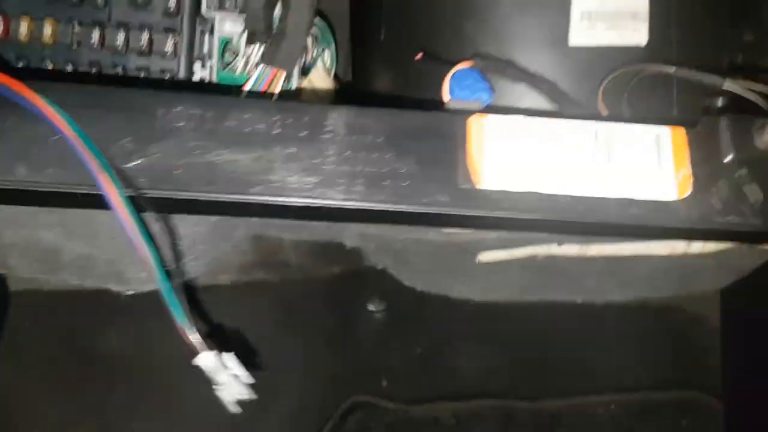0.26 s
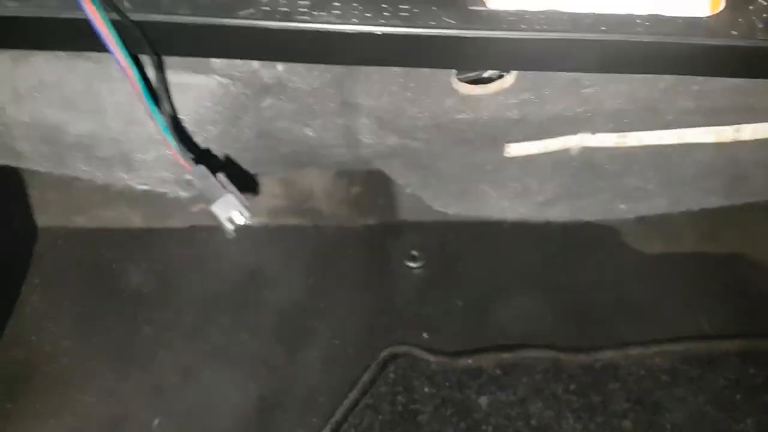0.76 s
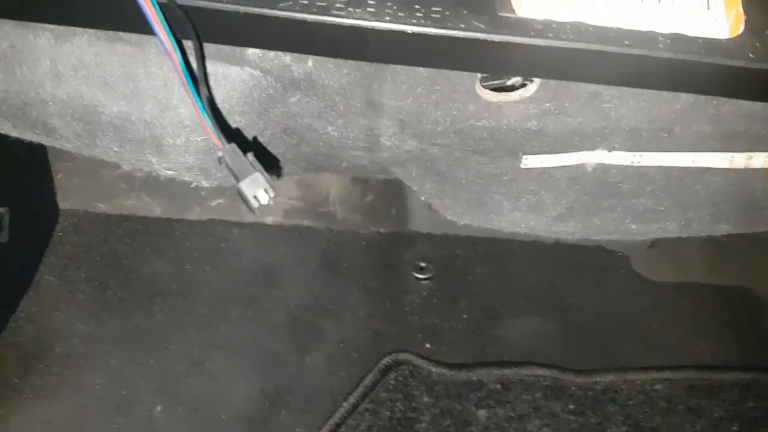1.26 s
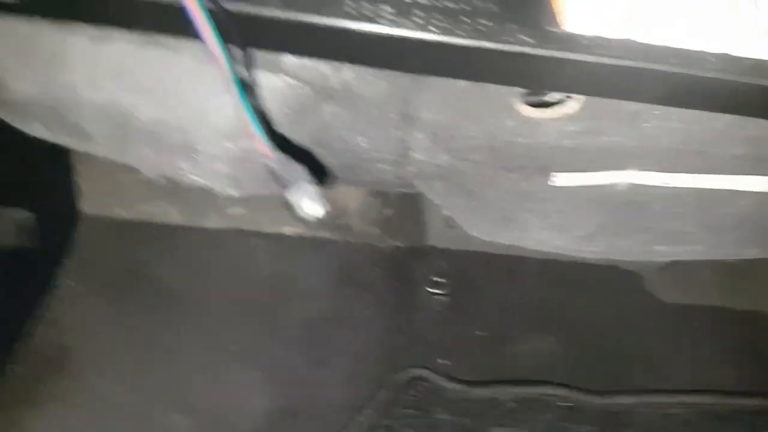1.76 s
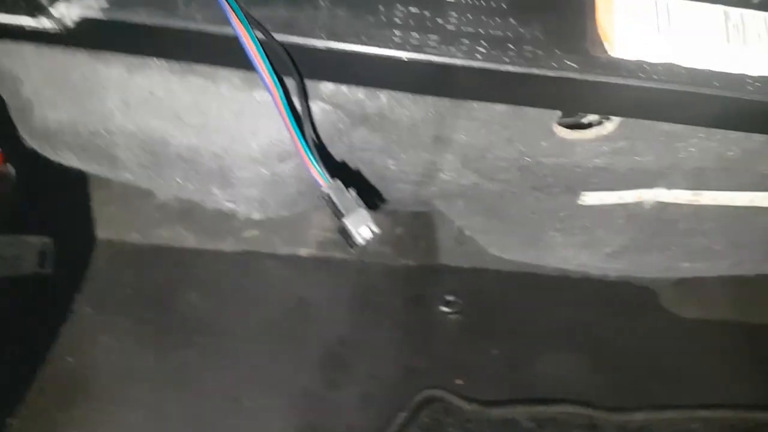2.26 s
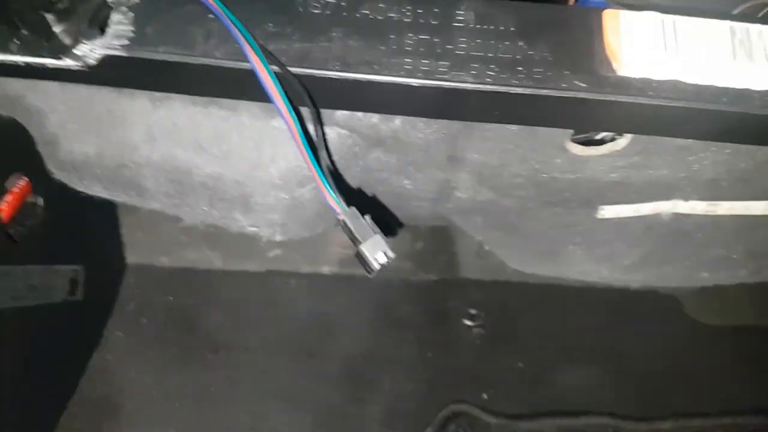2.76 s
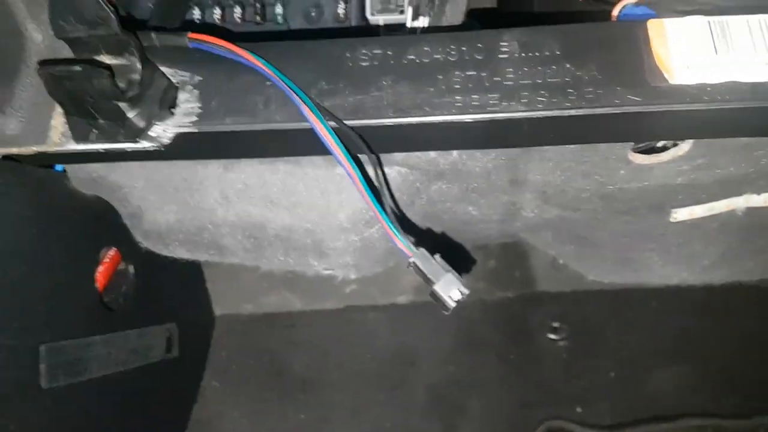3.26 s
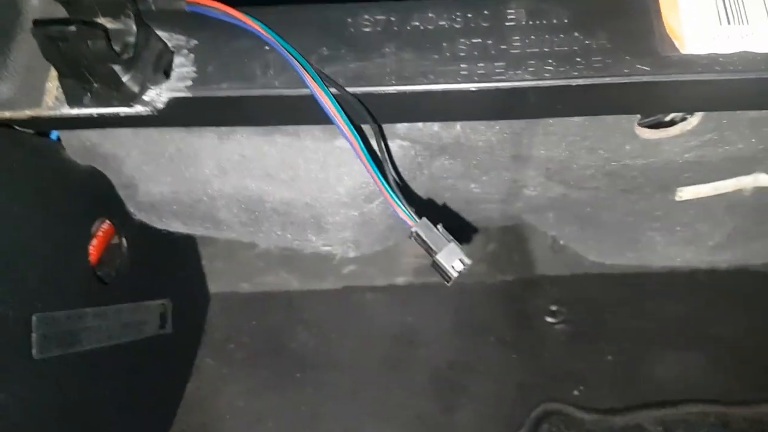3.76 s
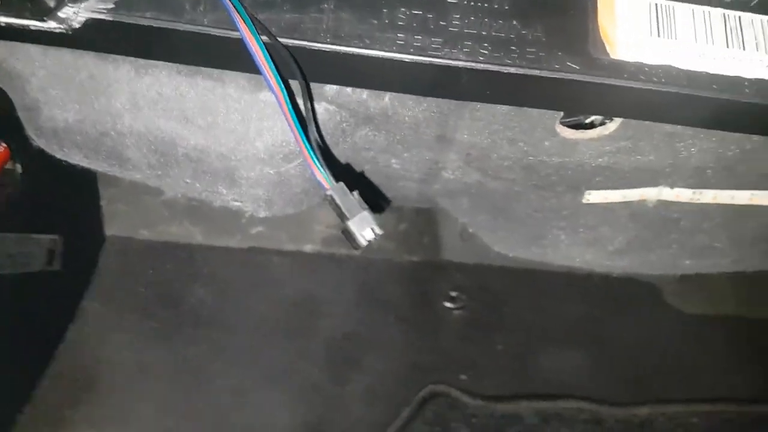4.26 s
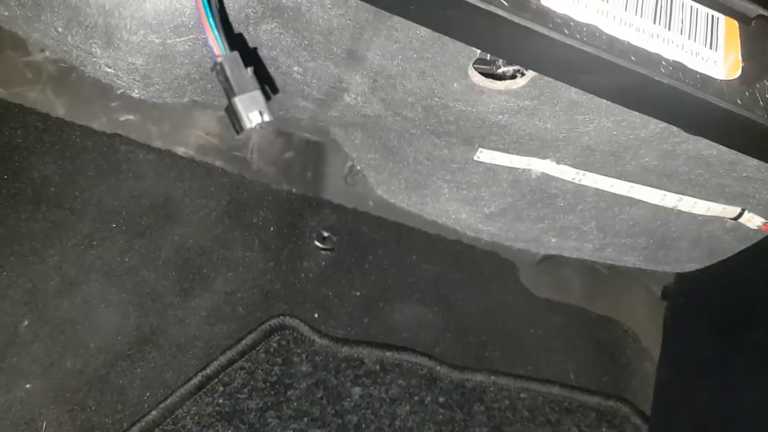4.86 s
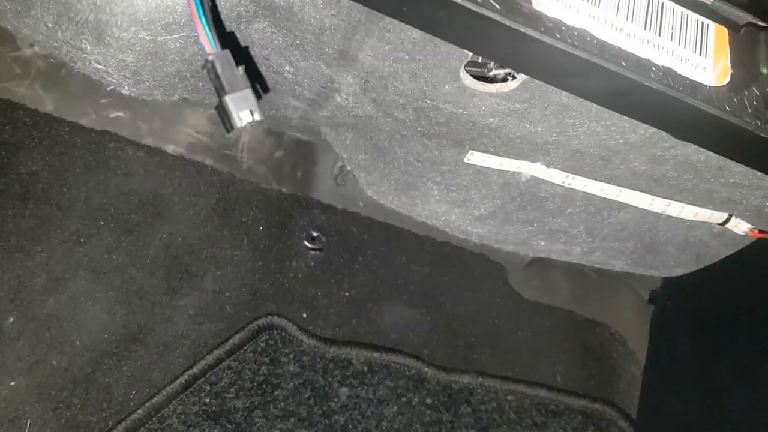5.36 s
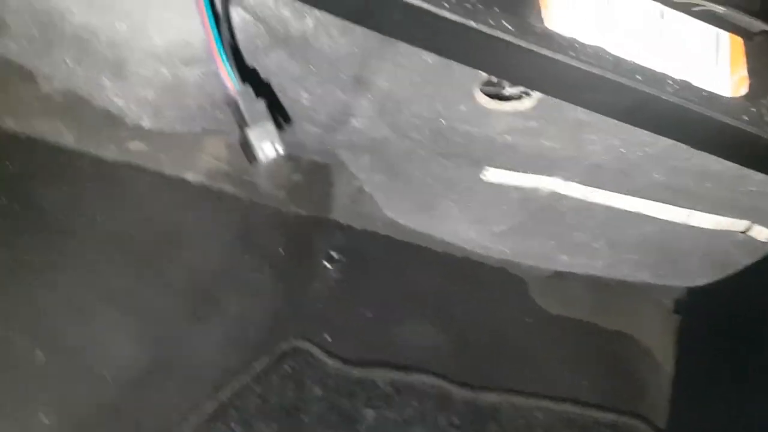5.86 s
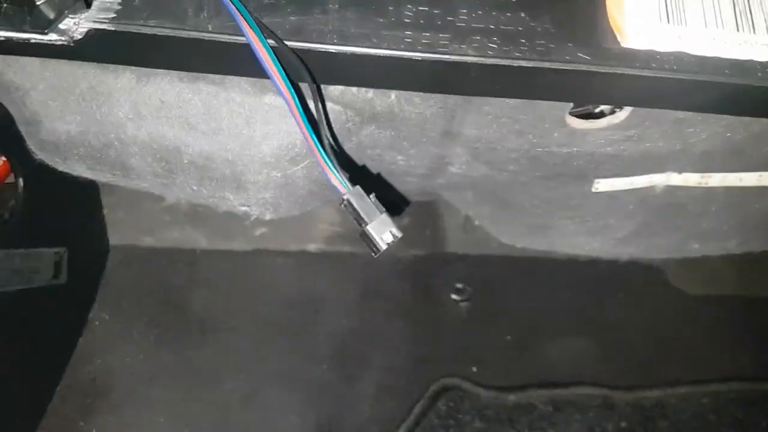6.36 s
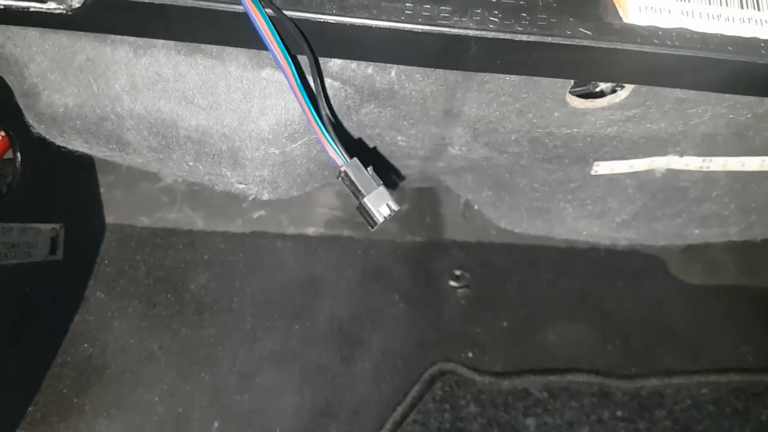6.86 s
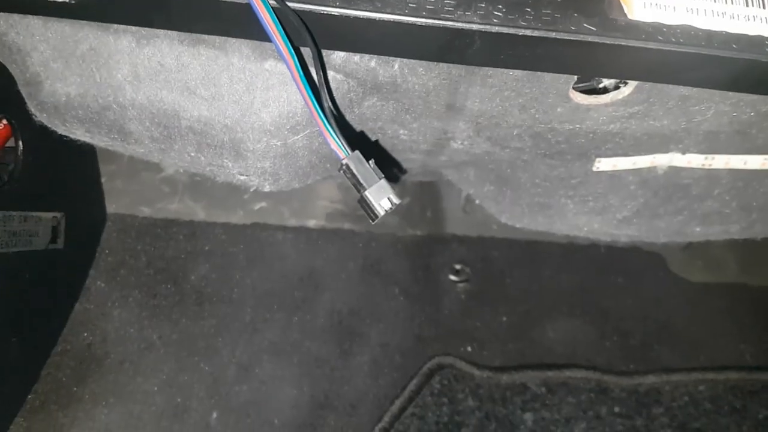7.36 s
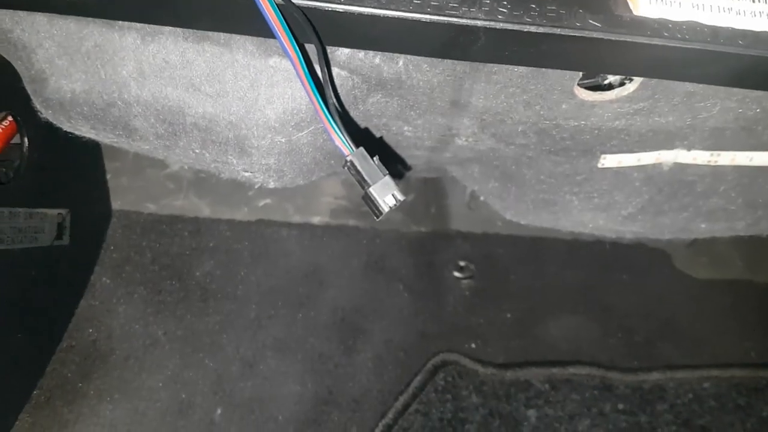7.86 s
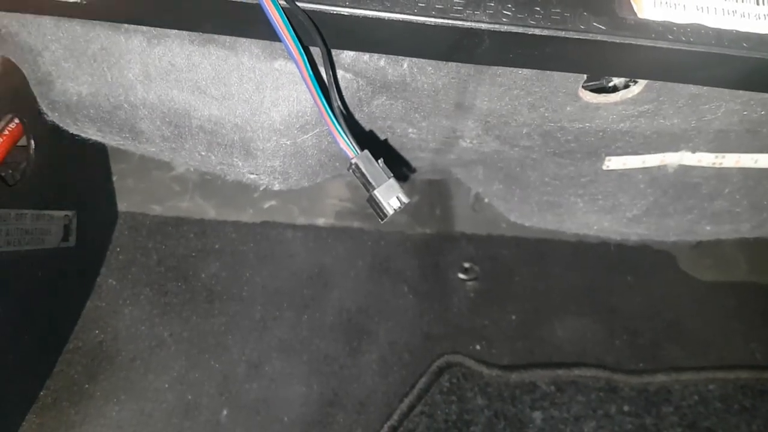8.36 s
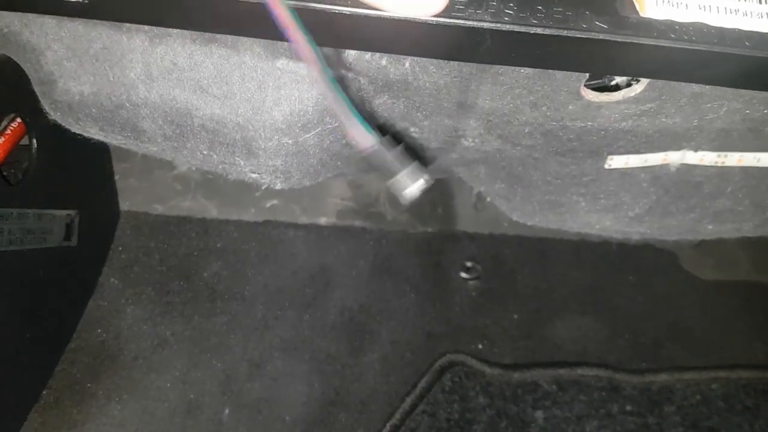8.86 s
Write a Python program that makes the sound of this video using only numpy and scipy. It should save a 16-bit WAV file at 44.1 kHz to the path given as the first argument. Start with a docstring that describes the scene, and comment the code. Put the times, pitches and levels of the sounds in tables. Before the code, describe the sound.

Close handling rustle opens, fading to faint cabin rumble. Plastic panel clips release with sharp cracks and hollow knocks, irregularly spaced, with a burst of stick-slip scraping after the second big knock. Tiny clicks and soft settling thuds fill the gaps, and a far bird is barely audible. The last second and a half is finger rubbing, ticks and short hollow scrapes on the hand-held phone in a dry car interior.

```python
"""Prying trim off in a parked car

Plastic clips let go with a crack and a hollow knock: impulses that excite decaying panel modes and a dense ring.
Between them the panel drags and judders by stick-slip; soft low modes thud as it settles and the phone is bumped.
At the start and near the end fingers slide over the hand-held phone and tap its case, as noise and resonances;
a sleeve brushes faintly before the later slides. Shaped noise gives the faint rumble of the cabin and a rustle
of sleeves; a far bird cries three times on a falling harmonic tone."""
import sys
import numpy as np
from scipy import signal
from scipy.fft import rfft, irfft, next_fast_len
from scipy.io import wavfile
from scipy.ndimage import uniform_filter1d

SR = 44100
rng = np.random.default_rng(int(sys.argv[2]) if len(sys.argv) > 2 else 0)


def to_wav(s):
    """Save 16-bit WAV."""
    ch = np.atleast_2d(s).T  # columns
    pcm = np.round(np.clip(ch, -1, 1) * 32767)  # PCM
    wavfile.write(sys.argv[1], SR, pcm.astype(np.int16))


N = 402191
TIME = np.arange(N) / SR
PIVOT_HZ = 1000  # the brightness tilt of a blow turns about this frequency
# Edges of the frequency zones in which a blow is balanced, from boom to tick: a single list in Hz.
ZONE_EDGES = [90, 220, 450, 1250, 2400, 7000, 16000]
# Spectrum of the dragged panel. Each row: frequency in Hz, relative level in dB.
DRAG_SPECTRUM = [(50, -32.5), (100, -14), (200, -9), (290, -3), (480, -10.5), (560, -10.5), (800, -21.5),
                 (1300, -23.5), (2200, -27.5), (3200, -32.5), (5000, -38.5), (7500, -44), (9500, -51.5),
                 (15000, -53)]
# Spectrum of rubbing on the phone. Each row: frequency in Hz, relative level in dB.
RUBBING_SPECTRUM = [(300, -4), (700, 7), (1400, 2), (2400, -2), (3400, -8), (5000, -9.5), (7000, -10.5),
                    (9000, -19), (12000, -15.5), (15500, -16.5)]


def undb(db):
    """Amplitude gain is ten to the power of the level in decibels over twenty."""
    return 10 ** (np.asarray(db) / 20)


def unit(x):
    """Normalise to a root-mean-square of 1."""
    return x / np.sqrt(np.mean(x ** 2))


def steady(x, size=1500):
    """Divide by the running rms over size samples: slow swings even out and the fine grain stays."""
    power = x ** 2
    running = uniform_filter1d(np.mean(power, axis=0), size)
    return x / np.sqrt(running + 1e-3 * np.mean(power))


def add(track, s, sound):
    """Superpose a stereo sound on the track from time s in seconds."""
    i = max(int(s * SR), 0)
    track[:, i:i + sound.shape[1]] += sound[:, :max(N - i, 0)]


def along(points, hz):
    """Interpolate (Hz, value) points linearly over log frequency."""
    f, value = np.transpose(points)
    return np.interp(np.log(np.maximum(hz, 1)), np.log(f), value)


def colour(x, points, size=4096):
    """Minimum-phase filter through (Hz, dB) points: folding the real cepstrum makes it causal."""
    log_gain = np.log(undb(along(points, np.fft.rfftfreq(size, 1 / SR))))
    cepstrum = irfft(log_gain)
    cepstrum[1:size // 2] *= 2
    cepstrum[size // 2 + 1:] = 0
    impulse_response = irfft(np.exp(rfft(cepstrum)))
    return signal.fftconvolve(x, impulse_response[None], axes=1)[:, :x.shape[1]]


def cut(x, hz, kind, order=4):
    """Butterworth filter, maximally flat in its passband."""
    return signal.sosfilt(signal.butter(order, hz, kind, fs=SR, output="sos"), x)


def resonate(x, hz, q):
    """Second-order resonance of sharpness q, with its output at rms 1."""
    return unit(signal.lfilter(*signal.iirpeak(hz, q, fs=SR), x))


def diffuse(n, likeness=0.52):
    """Diffuse-field noise at two spaced ports: sinc coherence, alike in the bass and not in the treble."""
    gap_m, sound_speed = 0.18, 343  # m, m/s
    size = next_fast_len(n, True)
    coherence = np.sinc(2 * np.fft.rfftfreq(size, 1 / SR) * gap_m / sound_speed)
    alike = min(likeness, 0.99) * coherence
    mid, side = rfft(rng.standard_normal((2, size))) * np.sqrt([1 + alike, 1 - alike])
    return unit(irfft([mid + side, mid - side], size)[:, :n])


def walk(rate):
    """Slow random modulation of rms 1: random values, changing rate times a second, smoothed into ramps."""
    k = int(SR / rate)
    held = np.repeat(rng.standard_normal(N // k + 1), k)
    return unit(uniform_filter1d(held, k)[:N])


def follow(s, db):
    """Gain along a level curve interpolated in dB over time, silent outside it."""
    return undb(np.interp(TIME, s, db, left=-np.inf, right=-np.inf))


def stroke(s, length, swell_db=0):
    """Envelope of one slide: linear attack, a hold changing by swell_db per second, exponential release."""
    attack_s, release_s = 0.013, 0.011
    t = TIME - s
    attack = np.clip(t / attack_s, 0, 1)
    hold = undb(swell_db * np.clip(t, 0, length))
    release = np.exp(-np.clip((t - length) / release_s, 0, 20))
    return attack * hold * release


def slips(rate, scatter_db):
    """Stick-slip as a random impulse train: small releases, uneven in spacing and size."""
    chance = rng.random(N) < rate / SR
    return chance * undb(scatter_db * np.clip(rng.standard_normal(N), -2, 2))


def pops():
    """Impulsive release of clips and knocks on the seat: each favours a bending mode and one of the rib."""
    # Each row: start in seconds, level in dB, brightness in dB per octave, ring time factor,
    # direct snap in dB before balancing, flex mode in Hz, its weight in dB, rib mode in Hz, its weight in dB,
    # bite around 3 kHz in dB, treble left minus right in dB.
    releases = [(0.7896, -21.5, -1.54, 0.96, 22, 313.5, 3.5, 540, -8, -5.5, 1.5),
                (0.825, -49.5, -5, 1.86, 7, 291, 18.5, 544, -11, 2, 1),
                (1.091, -60.5, 3, 0.21, 8, 177, 11, 860, -9, 11, -5),
                (1.2418, -18.5, 1.5, 0.94, 4, 292, -13, 2050, -13.5, 2.5, 5),
                (1.2487, -35, -0.5, 1.5, -9, 302, -14, 1140, -14, -19, 0),
                (1.783, -43, -4.5, 1.5, 11, 323, -10, 572, 2, -7, 14),
                (1.837, -50.5, -6, 1.4, 12, 281, 9, 556, -5, 0, -6),
                (1.9091, -46.5, 1.5, 0.62, 23, 306, 3, 2400, -9.5, 6, 8),
                (1.93, -41.5, -6, 1.6, 12, 314, 2, 1350, -9, 0, 2),
                (1.956, -34.5, -2, 1.2, 16, 300, -10, 624, -3, -9, -7),
                (1.969, -43, -6, 1.1, 15, 298, 4.5, 2600, -7, -1, 11),
                (2.037, -33, -2.5, 1.35, 18.5, 280, -18, 569, -0.5, -11, -5),
                (2.055, -41.5, -3, 2, 18, 258, -2, 578, 6, -4, 11),
                (3.4699, -25, 5, 0.53, 30, 278, -7.5, 1537, -6, -10.5, 5),
                (3.473, -27.5, 2, 0.92, 19.5, 635, -19, 1787, -9, -0.5, 5.5),
                (3.6027, -56, 0.5, 1.05, 9, 215, 1, 2070, -14, 4, 0),
                (3.749, -60.5, 2.5, 0.36, 22, 287, -19, 1690, -9, -2, 6),
                (4.124, -63.5, -4, 1.3, 12, 297, 5.5, 1540, -16, 7, 6.5),
                (4.5935, -32, 1, 1.63, 14.5, 374.5, 2, 2460, -32, 3.5, 9.5),
                (4.607, -40.5, 2.5, 1.25, 6, 165, -2, 1260, -31, 2, -1),
                (4.679, -38.5, -2.5, 1.1, 10.5, 316.5, 2, 1910, -21, 5, 10),
                (4.833, -63, 2, 0.91, 13, 168, 6, 2210, -5.5, 2, 2),
                (5.3837, -53.5, 5, 0.96, 4, 307, -27.5, 1340, -4.5, -0.5, -1.5),
                (5.802, -56, 0.8, 0.65, 19, 289, -3.5, 955, -17.5, 1, 3.5),
                (6.1444, -28, -0.5, 0.43, 29, 602, -6.5, 1626, -4, -4.5, -9.5),
                (6.1532, -39, -3.5, 1.06, 14, 309, -3, 1566, -4.5, -5, -2),
                (6.165, -52, 0.5, 1.4, 9, 402, -5, 1650, -5, 4, 0),
                (6.532, -53, -4.5, 1.6, 14, 294, 6.5, 2130, -13, 1, 10),
                (6.541, -56.5, 2, 1.6, 11, 297, 8, 1950, -3, -5, 9),
                (6.749, -54.5, -3, 0.87, 20, 330, -8, 605, -5, 4, 8),
                (6.834, -59, -3.5, 0.61, 22, 330, 1, 593, 3, 4, 9)]
    # Level of each zone before the brightness tilt: a single list in dB.
    balance = [-12, -2, -5.5, -11.5, -17.5, -34]
    flex_t60_s, rib_t60_s = 0.085, 0.042  # before the ring time factor
    bite_hz, bite_span = 3000, 1.6  # centre of a barb's rasp; frequency ratio to its edges
    out = np.zeros((2, N))
    for s, db, brightness, ring, snap_db, flex_hz, flex_db, rib_hz, rib_db, bite_db, pan_db in releases:
        favoured = [(flex_hz, flex_db, flex_t60_s), (rib_hz, rib_db, rib_t60_s)]
        bite = [(bite_hz / bite_span, 0), (bite_hz, bite_db), (bite_hz * bite_span, 0)]
        knock = blow(balance, brightness, ring, snap_db, favoured, pan_db)
        add(out, s, undb(db) * colour(knock, bite))
    return out


def blow(balance_db, brightness, ring, snap_db, favoured, pan_db):
    """Contact excitation: a harder push tilts to the treble; the spot hit favours (Hz, dB, t60 s) modes."""
    # Raw spectrum of the plastic before balancing. Each row: frequency in Hz, relative level in dB.
    plastic = [(35, -19.5), (70, -7), (120, -17), (170, -1), (290, -5), (430, -1.5), (630, 0), (800, -10),
               (1000, -4), (1600, -9.5), (2800, -17.5), (3400, -22), (5200, -27.5), (7500, -33.5),
               (9500, -41.5), (13000, -40.5), (16000, -49)]
    knee_hz = 262  # below this, the hardness of the contact changes nothing
    edges = np.array(ZONE_EDGES)
    centres = np.sqrt(edges[1:] * edges[:-1])
    levels_db = balance_db + brightness * np.log2(np.maximum(centres, knee_hz) / PIVOT_HZ)
    out = colour(panel(ring, contact_db=snap_db, modes_db=-15.5), plastic)
    for _ in range(2):  # neighbouring zones overlap, so the balance is set in two passes
        out = colour(out, np.c_[centres, levels_db - zone_db(out)])
    t = np.arange(out.shape[1]) / SR
    for hz, db, t60 in favoured:
        tone = mode(t, hz, t60 * ring, port_phase=min(hz / PIVOT_HZ, 1))
        out = out + undb(db) * tone / np.linalg.norm(undb(zone_db(tone)))
    # the phone's body shades only the treble
    left = colour(out[[0]], [(900, 0.005), (4500, pan_db / 2)])
    right = colour(out[[1]], [(900, 0.005), (4500, -pan_db / 2)])
    return np.concatenate([left, right])


def panel(ring, contact_db, modes_db, count=9000):
    """Impulse response of the trim: a direct snap, its modes, and the dense ring of dashboard and footwell."""
    # Panel modes. Each row: frequency in Hz, relative weight in dB, t60 in seconds before the ring time factor.
    modes = [(162.7, -8, 0.11), (233, -9, 0.043), (303, -2, 0.13), (398, -4, 0.11), (552, -8, 0.077),
             (900, -2.5, 0.099), (1120, -17.5, 0.062), (1310, -6, 0.11), (1517, -4.5, 0.048),
             (2061, -3.5, 0.1), (2170, -2, 0.026), (2550, -9, 0.11), (2914, -1, 0.071), (4200, -7.5, 0.046)]
    # Decay of the dense ring. Each row: frequency in Hz, t60 in seconds before the ring time factor.
    footwell = [(100, 0.33), (260, 0.14), (700, 0.12), (1840, 0.089), (4850, 0.046), (12800, 0.056)]
    t = np.arange(count) / SR
    f = np.fft.rfftfreq(count, 1 / SR)
    noise = rfft(diffuse(count, likeness=0.39))
    centres = np.geomspace(100, 12800, 8)
    out = np.zeros((2, count))
    for hz, share in zip(centres, np.eye(len(centres))):
        band = irfft(noise * along(np.c_[centres, share], f), count)
        near_decay = 1000 ** (-t / (ring * along(footwell, hz)))
        # the rest of the cabin gives back a weak, longer tail
        cabin_decay = undb(-30.0) * 1000 ** (-t / 0.13)
        out += band * (near_decay + cabin_decay)
    for hz, db, t60 in modes:
        detuned_hz = hz * (1 + 0.0018 * rng.standard_normal())
        out += undb(modes_db + db) * mode(t, detuned_hz, ring * t60)
    # the barb chatters for an instant as it slips past the edge of its hole
    out += undb(contact_db - 6.5) * diffuse(count) * np.exp(-t / 0.0025)
    out[:, 0] += undb(contact_db)
    return out


def mode(t, hz, t60, port_phase=0.79):
    """Damped normal mode: it builds up within a quarter cycle, its phase (spread in rad) differing by port."""
    onset = 1 - np.exp(-(2 * np.pi * hz * t) ** 2)
    phase = port_phase * rng.standard_normal((2, 1))
    return onset * np.sin(2 * np.pi * hz * t + phase) * 1000 ** (-t / t60)


def zone_db(x, size=1323):
    """Band levels by Parseval's theorem: the spectral power of the first 30 ms, summed in each zone."""
    padded = 4 * size
    power = 2 * np.mean(np.abs(rfft(x[:, :size], padded)) ** 2, axis=0) / (padded * size)
    return 10 * np.log10(np.histogram(np.fft.rfftfreq(padded, 1 / SR), ZONE_EDGES, weights=power)[0])


def thuds():
    """Single-mode excitation as the panel settles, the dashboard sways and, near the end, the phone is bumped."""
    # Each row: start in seconds, frequency in Hz, level in dB, rise in seconds, t60 in seconds.
    pushes = [(0.79, 48, -40, 0.0018, .22), (0.957, 266, -20.5, 0.0059, 0.098),
              (0.98, 287, -20, 0.0046, 0.12), (0.971, 169, -33.5, 0.0092, 0.16),
              (1.096, 183, -45.5, .008, 0.13), (3.47, 128.6, -40, .002, 0.26),
              (3.478, 285, -36.5, 0.0034, 0.24), (4.594, 152, -31, 0.0021, 0.18),
              (4.608, 245.4, -27.5, 0.0029, 0.19), (4.682, 162, -27.5, 0.0035, 0.18),
              (6.046, 190, -41, .005, 0.11), (6.142, 76.6, -38.5, .002, 0.21),
              (6.146, 164.5, -36, 0.0023, 0.2), (7.826, 234, -36, .003, 0.079),
              (8.034, 247, -39, 0.0021, 0.11), (8.519, 191, -31, 0.0056, 0.14),
              (8.859, 176, -34.5, 0.005, 0.075)]
    out, t = np.zeros((2, N)), np.arange(SR // 2) / SR
    for s, hz, db, rise, t60 in pushes:
        cushion = 1 - np.exp(-(t / rise) ** 2)
        add(out, s, undb(db) * cushion * mode(t, hz, t60, port_phase=0.26))
    return out


def drags():
    """Stick-slip friction: coarse slips make the panel judder; fine ones from its grained surface add grit."""
    # One long pull along the seat. Each row: time in seconds, judder level in dB before a 2 dB cut,
    # grit level in dB before a 3 dB lift.
    pull = [(1.72, -54, -79), (1.763, -33, -53), (1.8, -31.5, -52.5), (1.817, -38, -57), (1.84, -32.5, -50),
            (1.955, -25.5, -42), (1.982, -34, -44.5), (2.026, -27.5, -50), (2.04, -31, -45),
            (2.068, -32, -52.5), (2.09, -33, -53), (2.154, -79, -83), (2.16, -68, -77)]
    # Brief shifts on the seat. Each row: peak time in seconds, swell time in seconds, judder level in dB,
    # grit level in dB.
    shifts = [(0.922, 0.0035, -44, -59), (0.976, 0.024, -39, -51.5), (1.11, 0.068, -56.5, -61.5),
              (1.321, 0.023, -47, -55), (1.561, 0.076, -51.5, -56), (2.466, 0.0084, -41.5, -57.5),
              (2.911, 0.041, -51, -62), (2.995, 0.043, -63, -60.5), (3.165, 0.014, -40, -55.5),
              (3.317, 0.012, -45, -62.5), (3.761, 0.028, -54, -65.5), (3.898, 0.023, -44, -53),
              (4.488, 0.013, -53.5, -73.5), (4.586, 0.0033, -41.5, -42.5), (4.971, 0.028, -58, -62),
              (5.27, 0.054, -62, -59.5), (6.05, 0.042, -53, -59.5), (6.24, 0.16, -60, -64.5),
              (6.467, 0.0059, -49, -69), (6.565, 0.012, -50, -65), (6.601, 0.0035, -47.5, -61),
              (6.643, 0.011, -56.5, -83), (6.723, 0.0052, -50, -72), (6.785, 0.022, -56.5, -65),
              (6.919, 0.058, -61, -75)]
    s, judder_db, grit_db = np.transpose(pull)
    pull_grit = follow(s, grit_db + 3)
    judder_power, grit_power = follow(s, judder_db - 2) ** 2, pull_grit ** 2
    for s, swell, judder_db, grit_db in shifts:
        near = np.abs(TIME - s) < 10 * swell
        pressure = np.exp(-np.abs((TIME[near] - s) / swell))
        judder_power[near] += pressure * undb(judder_db) ** 2
        grit_power[near] += pressure * undb(grit_db) ** 2
    judder = steady(cut(rub(rate=180, scatter_db=5.5), [115, 750], "band"), size=900)
    grit = steady(cut(rub(rate=2000, scatter_db=1.5), 748, "high"))
    # the edge of the panel chafes with a thin ring under the long pull
    chafe = undb(-16.5) * resonate(grit, 2220, q=9.4)
    return judder * np.sqrt(judder_power) + grit * np.sqrt(grit_power) + chafe * pull_grit


def rub(rate, scatter_db, count=4):
    """Multi-point friction: each contact rings the panel its own way while the load shifts between them."""
    out = 0
    for _ in range(count):
        pushes = slips(rate / count, scatter_db)
        load = undb(5.69 * walk(25))
        response = colour(panel(0.81, contact_db=2, modes_db=-16.5), DRAG_SPECTRUM)
        loaded = (pushes - pushes.mean()) * load
        out = out + signal.oaconvolve(loaded[None], response, axes=1)[:, :N]
    return out


def creep():
    """Slow creep of the held panel as low-passed noise: faint and wavering under the other sounds."""
    texture = unit(cut(colour(diffuse(N), DRAG_SPECTRUM), 600, "low"))
    return texture * stroke(0.47, length=7.3) * undb(-72 + 4 * walk(19))


def taps():
    """Impact on a resonant case: short, bright ticks of fingers on the phone, mostly nearer the left port."""
    # Each row: start in seconds, level in dB, brightness in dB per octave, ring time factor,
    # case mode in Hz, its weight in dB, treble left minus right in dB.
    ticks = [(0.329, -71, 3, 0.33, 4400, -6, 6), (0.367, -55.5, -0.5, 0.45, 2270, 3.5, 22.5),
             (0.366, -61, 1.5, 0.33, 4330, 6.5, 3), (7.814, -70, 2, 0.27, 3080, 7, 9),
             (7.8208, -40, 2.5, 0.31, 1500, -17, 8), (7.9126, -42.5, -0.5, 0.39, 2580, -0.5, 9),
             (7.917, -51.5, -0.5, 0.72, 744, 9.5, -8), (8.4744, -46.5, -2, 1.4, 652, 5, 1),
             (8.539, -55, 0, 0.66, 940, 10, 3), (8.56, -54, -1.5, 0.64, 890, 6.5, 3),
             (8.592, -50, -2, 1, 6400, -12, 3), (8.676, -53.5, -7.5, 0.55, 2280, -11, 0),
             (8.757, -52.5, 0, 1.2, 5400, -9, 4), (8.777, -56, 1.5, 0.6, 6850, -13, 4),
             (8.797, -59, 1, 0.46, 885, -11, 5), (8.851, -59, 0.5, 0.46, 2200, -14, 3),
             (9.014, -55, -0.5, 1.9, 730, -6, 3), (9.068, -62, 3.5, 0.8, 7000, -11, 6),
             (9.086, -57, 1, 0.5, 2620, -9, 4)]
    # Level of each zone before the brightness tilt: a single list in dB.
    balance = [-12, -8.5, -8.5, -7, -7, -11]
    out = np.zeros((2, N))
    for s, db, brightness, ring, hz, mode_db, pan_db in ticks:
        favoured = [(hz, mode_db, 0.04)]
        add(out, s, undb(db) * blow(balance, brightness, ring, -7.5, favoured, pan_db))
    return out


def fingers_and_sleeve():
    """Friction noise of sliding fingers, and at 7.27 s a faint brush of a sleeve, mostly nearer the left port."""
    # Each row: start in seconds, length in seconds, rasp level in dB at the start, swell in dB per second,
    # hiss against rasp in dB, left minus right in dB, ring of the rubbed spot in Hz,
    # its level against rasp in dB, crackle against rasp in dB. The row at 7.269 is the sleeve.
    slides = [(0, 0.26, -54, -48, -15, 3, 2100, -23, -13), (0.267, 0.037, -58, 94, -11, 4.5, 2170, -4, -13),
              (0.312, 0.24, -59.5, -61, -13, 2.5, 1400, -24, -3),
              (7.269, 0.13, -70, -13, -11.5, 6, 2990, -14.5, -11),
              (7.695, 0.12, -50, 122.5, -11.5, 4.5, 2470, -12.5, -12),
              (7.849, 0.18, -55.5, -9, -21, 5, 2800, -7, -6),
              (7.898, 1, -51, -30.5, -10.5, 3, 2480, -20, -22),
              (8.497, 0.098, -50, -5, -11.5, 4, 2230, -16, -2),
              (8.608, 0.074, -51, 25, -14, 5, 2300, -14, -12),
              (8.685, 0.13, -60.5, -59, -16, -1, 2380, -21, -6),
              (8.78, 0.074, -49, 8, -9, 3, 4350, -13, -13),
              (8.862, 0.16, -51, -54, -11, 2, 2420, -24, -4.5),
              (9.014, 0.1, -54, 26, -8.5, 4, 3000, -28, -4)]
    friction, grains = ridges_on_case(), crackle()
    stutter = undb(1.4 * walk(70))
    rasp = steady(cut(friction, [520, 4000], "band")) * stutter
    hiss = steady(cut(friction, 4200, "high")) * stutter
    out = np.zeros((2, N))
    for s, length, db, swell_db, hiss_db, pan_db, spot_hz, spot_db, crackle_db in slides:
        lean = np.array([[pan_db], [-pan_db]]) / 2
        spot = resonate(rasp + hiss / 2, spot_hz, q=1.6)
        rubbing = rasp + undb(hiss_db) * hiss + undb(spot_db) * spot + undb(crackle_db) * grains
        out += stroke(s, length, swell_db) * undb(db + lean) * rubbing
    return out


def ridges_on_case(count=7):
    """Impulse trains through short responses: fine ridges catch, and each spot rings with its own colour."""
    t, out = np.arange(1024) / SR, 0
    for _ in range(count):
        catches = slips(rate=2600, scatter_db=2) * rng.standard_normal(N)
        spot = diffuse(len(t)) * np.exp(-t / 0.0035)
        load = undb(6 * walk(20))
        out = out + signal.oaconvolve((catches * load)[None], spot, axes=1)[:, :N]
    return colour(out, RUBBING_SPECTRUM)


def crackle(count=5):
    """Sparse stick-slip: now and then a ridge catches hard and snaps free, each spot with its short ring."""
    t, out = np.arange(512) / SR, 0
    for _ in range(count):
        spot = diffuse(len(t)) * np.exp(-t / 0.002)
        catches = slips(260 / count, scatter_db=4.5)  # 260 per second over all spots
        out = out + signal.oaconvolve(catches[None], spot, axes=1)[:, :N]
    return steady(cut(colour(out, RUBBING_SPECTRUM), 450, "high"), size=4000)


def sticking():
    """Stick-slip driving resonances: a fingertip grips and slips, drawing a hollow scrape from the case."""
    # Each row: start in seconds, length in seconds, level in dB.
    scrapes = [(8.468, 0.016, -45), (8.503, 0.044, -40.5), (8.586, 0.014, -38.5)]
    # Resonances of the case. Each row: frequency in Hz, width in Hz, relative level in dB.
    resonances = [(564.5, 9.9, 10.5), (692, 14, -2), (916, 17, 5), (2040, 34, -4), (2650, 130, -14),
                  (3970, 90, -15), (4700, 55, -13), (6390, 43, -22)]
    catches = diffuse(N) * slips(rate=1600, scatter_db=-1.0)
    ring = sum(undb(db) * resonate(catches, hz, hz / width) for hz, width, db in resonances)
    return steady(ring) * sum(undb(db) * stroke(s, length) for s, length, db in scrapes)


def grip():
    """Handling noise: the grip shifting on the phone rumbles as low noise that both ports hear much alike."""
    # Two lists of points, at the start and at the end. Each row: time in seconds,
    # rumble level in dB before a 1 dB cut.
    grip_shifts = [
        [(0.0, -45), (0.024, -56), (0.11, -60.5), (0.322, -51.5), (0.404, -60.5), (0.47, -67), (0.514, -73),
         (0.6, -86)],
        [(7.68, -62.5), (7.732, -49), (8.428, -53.5), (8.532, -44.5), (8.8, -53), (8.868, -45.5),
         (8.928, -50.5), (9.12, -46)],
    ]
    # Spectrum of the rumble. Each row: frequency in Hz, relative level in dB.
    rumble_spectrum = [(18, -27), (30, -1), (128, -1), (196, 1.5), (243, 1), (389, -2), (502, -8.5),
                       (579, -17.5), (900, -36), (1170, -13), (1980, -120)]
    rumble = steady(colour(diffuse(N, likeness=0.89), rumble_spectrum))
    return rumble * undb(-1) * sum(follow(*np.transpose(points)) for points in grip_shifts)


def sleeves():
    """Amplitude-modulated noise: a faint, wavering rustle of sleeves."""
    cloth = [(100, -30.0), (300, 7.0), (700, -7.0), (1600, -4.5), (3200, -11), (8000, -21.5), (15000, -32.0)]
    waver = undb(2.2 * walk(10))
    return unit(colour(diffuse(N), cloth)) * waver * undb(-78)


def cabin():
    """Diffuse-field background: the low rumble and thin hiss of the cabin as spectrally shaped noise."""
    # Each row: frequency in Hz, relative level in dB.
    air_spectrum = [(13, -37.5), (22, -3), (49, 4), (87, -6), (118, -7.5), (160, -14), (467, -31.5),
                    (598, -25), (832, -19.5), (1010, -23), (1190, -25), (1360, -22.5), (1750, -26),
                    (4220, -35), (9500, -43.5), (13000, -36.5), (15800, -37)]
    return unit(colour(diffuse(N), air_spectrum, size=16384)) * undb(-59 + walk(10.0))


def bird():
    """Harmonic synthesis of a hoarse, falling cry from far away, with one echo and an exponential tail."""
    # Each row: start in seconds, starting pitch in Hz, level in dB.
    cries = [(3.975, 1575, -72.5), (5.098, 1605, -72.5), (5.88, 1565, -69.5)]
    # Relative levels of the harmonics from the fundamental up: a single list in dB.
    harmonics = [0, -7, -13]
    length_s, fall, hoarseness = 0.2, 0.12, 0.011  # fall and hoarseness are shares of the pitch
    echo_s, echo_db, tail_t60_s, tail_db = 0.125, -6, 0.9, 1
    out, t = np.zeros((2, N)), np.arange(int(0.7 * SR)) / SR
    progress = np.minimum(t / length_s, 1)
    envelope = np.sqrt(np.maximum(np.sin(np.pi * progress), 0))
    for s, hz, db in cries:
        pitch = hz * (1 - fall * progress ** 1.4 + hoarseness * walk(500)[:len(t)])
        phase = 2 * np.pi * np.cumsum(pitch) / SR
        flutter = undb(2.5 * walk(60)[:len(t)])
        voice = sum(undb(harmonic_db) * np.sin(k * phase) for k, harmonic_db in enumerate(harmonics, 1))
        cry = envelope * flutter * voice
        tail = diffuse(len(t)) * 1000 ** (-t / tail_t60_s)
        tail = tail / np.linalg.norm(tail[0])
        heard = cry + undb(tail_db) * signal.fftconvolve(cry[None], tail, axes=1)[:, :len(t)]
        add(out, s, undb(db) * heard)
        add(out, s + echo_s, undb(db + echo_db) * heard)
    return out


def scene():
    """Linear superposition of trim, handling of the phone, sleeves, cabin and a far bird at the two ports."""
    trim = pops() + thuds() + drags() + creep()
    handling = taps() + fingers_and_sleeve() + sticking() + grip()
    return trim + handling + sleeves() + cabin() + bird()


def record(dry):
    """Band limits of the phone: a high-pass drops the deepest bass, a steep elliptic low-pass cuts the top."""
    without_bass = cut(dry, 46, "high", order=3)
    return signal.sosfilt(signal.ellip(8, 0.2, 70, 16100, fs=SR, output="sos"), without_bass)


dry = scene()
out = record(dry)
to_wav(out)
```